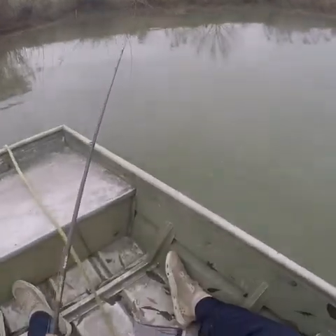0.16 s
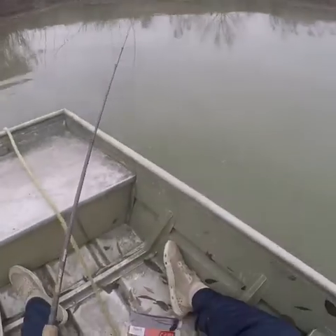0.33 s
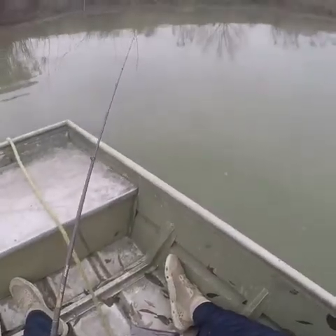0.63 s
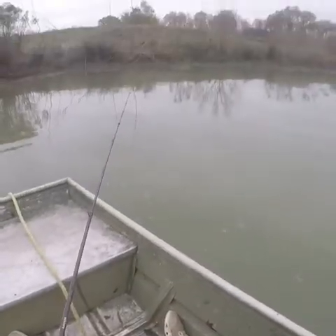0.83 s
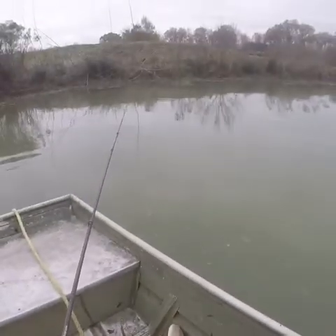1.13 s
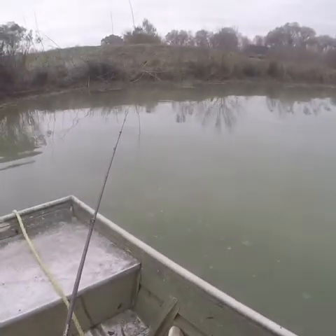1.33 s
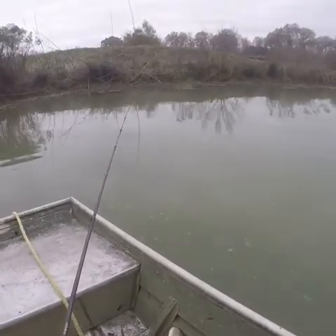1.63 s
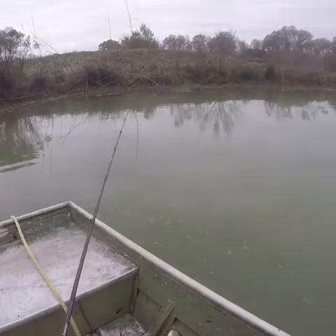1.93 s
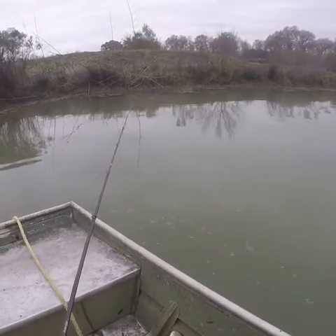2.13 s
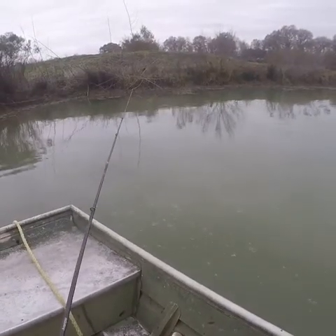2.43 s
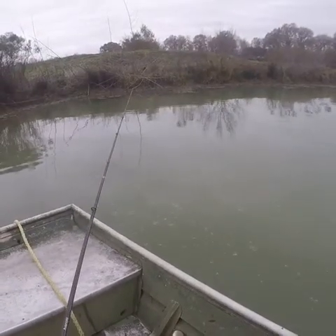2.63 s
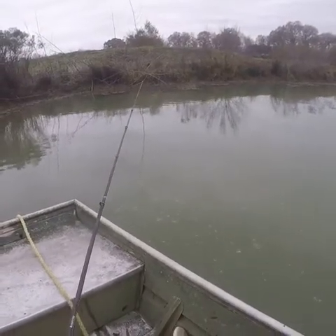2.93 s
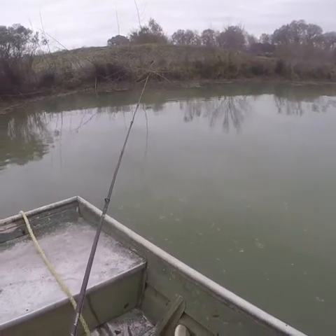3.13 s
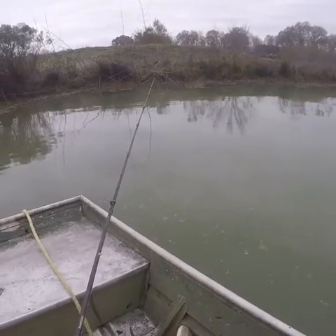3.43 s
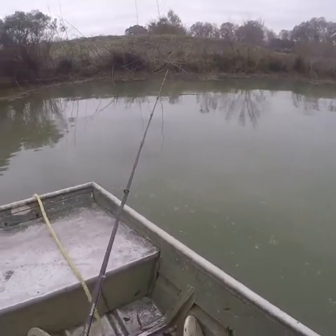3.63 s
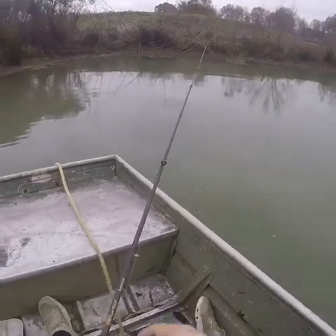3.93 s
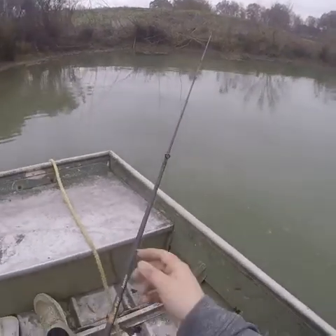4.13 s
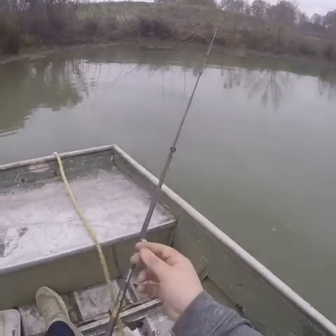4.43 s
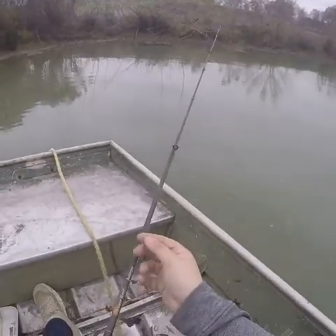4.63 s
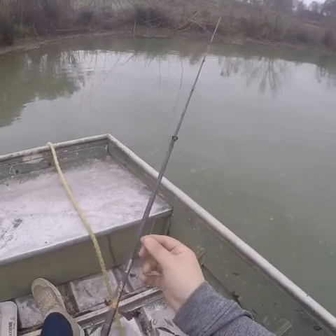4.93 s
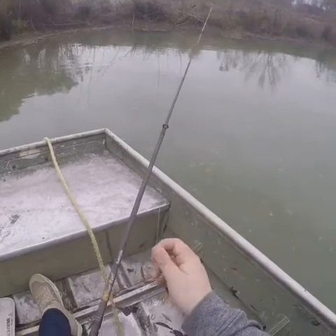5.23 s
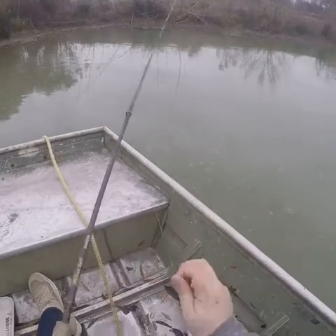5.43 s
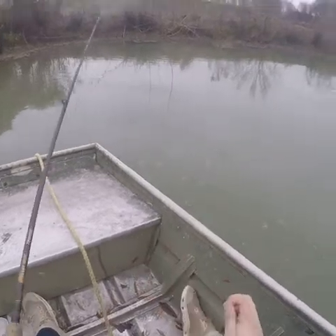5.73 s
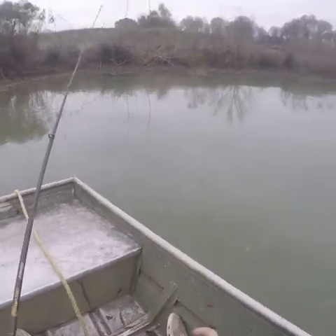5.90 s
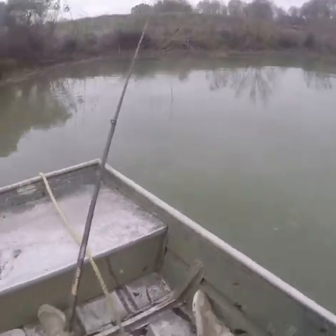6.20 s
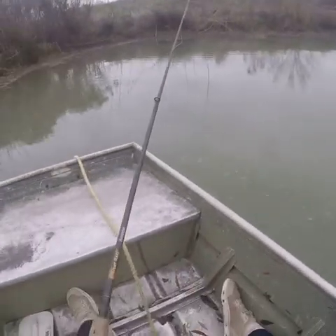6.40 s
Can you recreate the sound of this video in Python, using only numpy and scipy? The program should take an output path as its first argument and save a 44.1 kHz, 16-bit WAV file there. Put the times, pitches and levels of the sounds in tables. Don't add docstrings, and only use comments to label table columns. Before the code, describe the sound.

Irregular knocks, clacks and hollow low booms on a small metal boat's hull, over faint rumble and hiss on a still pond.

```python
import sys
import numpy as np
from scipy import signal
from scipy.fft import rfft, irfft, next_fast_len
from scipy.io import wavfile
from scipy.ndimage import uniform_filter1d, map_coordinates

SR = 44100
rng = np.random.default_rng(int(sys.argv[2]) if len(sys.argv) > 2 else 0)


def elevation(decibels):
    levels = np.asarray(decibels, float)
    return 10 ** (levels / 20)


def to_wav(sig):
    pcm = np.clip(np.atleast_2d(sig), -1, 1) * 32767
    pcm = np.round(pcm).astype(np.int16)
    wavfile.write(sys.argv[1], SR, pcm.T)


N = 289296

# t/s, peak level/dB, f/Hz, rebound re push/dB
PUSHES = [(0.057, -25, 100.5, -33), (0.116, -29.5, 91, -24), (0.382, -47, 112, -39),
          (0.486, -25, 110.5, -33), (0.566, -21.5, 100, -29), (0.798, -28.5, 112, -29),
          (0.854, -28, 93.5, -21), (1.221, -24.5, 116.2, -5.5), (1.513, -24.5, 102.8, -12),
          (1.811, -20.5, 100.6, -4), (1.965, -40, 106, -18), (2.118, -40.5, 91, -2),
          (2.367, -30.5, 100, -2), (2.594, -23, 117.4, -16), (2.879, -30.5, 106, -5),
          (3.002, -29, 104.5, -5), (3.3, -27.5, 112.7, -0.5), (3.555, -39.5, 118, -1),
          (3.678, -30, 88, -33), (3.979, -34, 91.4, 2.5), (4.213, -29.5, 107.8, -7), (4.496, -40, 124.3, 2),
          (4.77, -30.5, 103, -20), (4.829, -28, 104.5, -4), (5.264, -23.5, 92, 1), (5.489, -43, 91.7, -10),
          (5.801, -44.5, 102.6, 0), (5.967, -38.5, 119.6, -23), (6.134, -29.5, 92, 0),
          (2.756, -27, 104, -25)]


def unit(x):
    return x / np.sqrt(np.mean(x ** 2) + 1e-20)


def peak_one(x):
    return x / np.sqrt(uniform_filter1d(x ** 2, size=400).max() + 1e-20)


def wobble(rate):
    knots = rng.standard_normal(int(N * rate / SR) + 4)
    return map_coordinates(knots, [np.arange(N) * rate / SR])


def filtered(x, response):
    m = next_fast_len(len(x) + 4096)
    return irfft(rfft(x, m) * response(np.fft.rfftfreq(m, 1 / SR)), m)[:len(x)]


def resonance(f, hz, width_hz):
    return 1j * f * width_hz / (hz * hz - f * f + 1j * f * width_hz + 1e-9)


def noise(spectrum):
    hz, db = np.transpose(spectrum)
    colour = lambda f: elevation(np.interp(np.log(f + 1), np.log(hz + 1), db))
    return unit(filtered(rng.standard_normal(N), colour))


def add(track, s, sound):
    part = track[max(round(s * SR), 0):][:len(sound)]
    part += sound[:len(part)]


def bird():
    # t/s, length/s, first f/Hz, last f/Hz, level/dB
    calls = [
        (1.5, .3, 1300, 1280, -73),
        (2.8, .23, 1310, 1380, -77),
        (3.08, .19, 1350, 1490, -76),
    ]
    rise_s, fall_s, edge_db = 0.04, 0.07, -15
    out = np.zeros(N)
    t = np.arange(N) / SR
    for s, length, first_hz, last_hz, level_db in calls:
        end = s + length
        hz = np.interp(t, [s, end], [first_hz, last_hz])
        edge = np.interp(t, [s, s + rise_s, end - fall_s, end], [1, 0, 0, 1])
        rasp = elevation(3 * wobble(120))
        waver = 1 + 0.045 * wobble(120)
        tone = np.sin(2 * np.pi * np.cumsum(hz * waver) / SR)
        out += elevation(level_db + edge_db * edge - 9) * rasp * tone * (edge < 1)
    return out


def pond():
    # f/Hz, level/dB per Hz
    rumble_colour = [(8.8, -48), (15, -1.5), (49, 11.5), (91, 9), (123, 1), (170, -17), (220, -59),
                     (370, -120)]
    # f/Hz, level/dB per Hz
    hiss_colour = [(350, -32), (600, -2), (717, -11), (1010, -9.5), (3680, -13), (4710, -12.5), (4980, -21),
                   (5480, -16), (6830, -18), (11800, -21), (13400, -20), (15100, -22.5), (16000, -49)]
    insects = unit(filtered(rng.standard_normal(N), lambda f: resonance(f, 5040, 150)))
    chorus = elevation(1.5 * wobble(3)) * insects
    whine = np.sin(2 * np.pi * 13668 * np.arange(N) / SR)
    out = elevation(-47.5) * noise(rumble_colour) + elevation(-68.5) * noise(hiss_colour)
    return out + elevation(-79.5) * chorus + elevation(-94) * whine


def brushes():
    # t/s, length/s, level/dB, centre f/Hz, width/Hz
    strokes = [(1.338, 0.033, -69, 2490, 500), (1.345, 0.076, -64, 4870, 3980),
               (1.387, 0.035, -61, 2120, 700), (1.469, 0.025, -63, 2200, 1500),
               (1.49, 0.13, -70, 2960, 4000), (1.786, 0.056, -61.5, 4440, 5000),
               (2.176, 0.047, -63, 5060, 3000), (2.532, 0.025, -59.5, 4450, 2000),
               (2.636, .015, -65, 4460, 3000), (2.91, 0.058, -66, 2980, 5000), (4.272, .02, -68, 1520, 150),
               (4.285, .04, -69.5, 3000, 600), (4.299, 0.061, -65.5, 5600, 6000),
               (5.582, 0.036, -70, 6100, 1200), (2.557, .014, -56, 12800, 3500),
               (2.558, 0.0073, -51.5, 10300, 1500), (2.58, .01, -67, 12000, 5000),
               (2.535, 0.021, -60, 2000, 1500), (2.533, .016, -70, 12000, 5000),
               (2.577, .03, -70, 4500, 4000), (1.799, 0.024, -55, 2210, 2000), (1.8, .009, -68, 6240, 1200),
               (1.829, 0.0073, -66, 4500, 3000), (1.233, 0.008, -54, 2000, 1500),
               (1.242, .011, -46.5, 3480, 2500), (1.25, .006, -64, 4000, 2000),
               (1.202, .014, -60, 1500, 1000), (1.364, 0.029, -59, 2480, 500), (1.37, .02, -72, 5500, 3500),
               (1.422, 0.023, -60, 4180, 800), (1.492, 0.013, -57.5, 5000, 5000),
               (5.118, 0.028, -59, 3000, 2470), (5.124, 0.0093, -59.5, 1200, 596),
               (5.255, 0.014, -62.5, 5030, 1500), (5.255, 0.021, -64, 2330, 1800),
               (4.579, 0.013, -58, 2000, 2500), (4.848, 0.017, -59, 3500, 5000),
               (3.972, 0.025, -54, 1800, 1200), (3.98, .03, -65, 1400, 1200), (5.14, .015, -67, 2200, 1500)]
    out = np.zeros(N)
    fibres = rng.standard_normal(N) * elevation(2.0 * wobble(300))
    for s, length, db, hz, width_hz in strokes:
        stroke = fibres[round(s * SR):][:round(length * SR)]
        stroke = unit(filtered(stroke, lambda f: resonance(f, hz, 1.18 * width_hz) ** 3))
        add(out, s, elevation(db) * stroke * np.hanning(len(stroke)) ** 0.57)
    return out


def murmur():
    # t/s, murmur level/dB
    load = [(0.0, -34.5), (0.2, -57.5), (0.4, -54.5), (1.04, -55.5), (1.38, -48), (1.62, -57),
            (2.01, -55.5), (2.35, -65), (2.56, -49), (3.07, -56.5), (4.29, -52.5), (4.44, -55),
            (5.17, -62.5), (5.33, -55), (5.52, -60.5), (5.88, -52), (6.05, -60.5), (6.56, -60.5)]
    # f/Hz, level/dB per Hz
    panel_colour = [(88, -23.5), (150, -5.5), (225, -13.5), (483, -11.5), (672, -26.5), (900, -32),
                    (1170, -49), (1980, -120)]
    slosh_db, slosh_rise_s, slosh_t60_s = -12, 0.017, 0.67
    load_s, load_db = np.transpose(load)
    panels_db = np.interp(np.arange(N) / SR, load_s, load_db)
    lumps = elevation(1.2 * wobble(25))
    panels = elevation(panels_db - 5.5) * unit(noise(panel_colour) * lumps)
    bottom = unit(filtered(rng.standard_normal(N), lambda f: resonance(f, 102.7, 40.2) ** 2))
    swing = np.zeros(N)
    t = np.arange(SR) / SR
    slosh = elevation(slosh_db - 60 * t / slosh_t60_s) * (1 - np.exp(-t / slosh_rise_s))
    for s, db, *_ in PUSHES:
        add(swing, s, elevation(db) * slosh)
    return panels + (swing + elevation(-61.5)) * bottom


def burst(t60, colour):
    t = np.arange(SR // 8) / SR
    decay = elevation(-60 * t / t60) + 0.041 * elevation(-60 * t / (2.7 * t60))
    shape = (1 - np.exp(-(t / 0.0018) ** 2)) * decay
    grains = np.repeat(rng.standard_normal(len(t) // 40 + 1), 40)[:len(t)]
    rattle = rng.standard_normal(len(t)) * elevation(3.5 * grains) * shape
    strike = 4.1 * (np.arange(len(t)) == round(0.00126 * SR))
    return peak_one(filtered(rattle + strike, colour))


def snaps():
    # t/s, peak level/dB, centre f/Hz, width/Hz, t60/s
    snap_rows = [(0, -55.5, 2460, 500, 0.033), (0, -55, 1530, 400, 0.059), (0.4767, -42, 3500, 600, 0.022),
                 (0.4783, -36, 4960, 1100, 0.022), (0.7835, -52.5, 6100, 1200, 0.027),
                 (.7855, -62, 15000, 1200, .025), (1.028, -54, 3000, 350, 0.025),
                 (1.03, -54.5, 4550, 408, 0.027), (1.2425, -51.5, 4600, 910, 0.034),
                 (1.241, -53, 2920, 1200, 0.03), (2.5615, -38.5, 2000, 1200, 0.047),
                 (2.562, -49, 3660, 900, 0.04), (3.002, -62, 5460, 4000, .015),
                 (3.974, -46, 1970, 600, 0.062), (3.975, -51, 4800, 920, 0.03),
                 (0.4772, -39, 2800, 700, 0.044), (1.19, -62, 1600, 1500, .07),
                 (1.4219, -52, 2170, 1500, .05), (1.483, -60.5, 1340, 300, 0.049),
                 (2.188, -60, 4500, 810, 0.023), (2.197, -52, 5500, 1360, 0.013),
                 (2.94, -65, 2200, 700, 0.035), (3.003, -61, 1750, 400, 0.025),
                 (3.2345, -60, 4300, 600, 0.025), (3.276, -70, 4250, 400, 0.022),
                 (3.289, -77, 4340, 500, .025), (3.605, -64, 2800, 900, 0.028),
                 (3.606, -61, 4630, 890, .04), (3.667, -54.5, 1390, 870, 0.074), (0, -55, 4220, 500, 0.034),
                 (0, -63, 6800, 2500, .015), (1.8243, -50.5, 5070, 900, 0.018),
                 (1.822, -56, 2850, 600, 0.02), (1.8245, -65, 7200, 2000, .02),
                 (3.877, -55.5, 1660, 1000, 0.018), (3.974, -49, 2800, 500, 0.046),
                 (5.124, -53.5, 2530, 1200, 0.048), (5.89, -60, 2010, 400, 0.027),
                 (3.235, -61, 6740, 1200, 0.022)]
    out = np.zeros(N)
    for s, db, hz, width_hz, t60 in snap_rows:
        add(out, s - 0.001, elevation(db) * burst(t60, lambda f: resonance(f, hz, width_hz) ** 2))
    return out


def ticks():
    # f/Hz, width/Hz, level/dB
    rim_modes = [(1295, 450, 13.5), (1900, 540, 9.5), (2530, 390, 2), (2600, 600, 4), (3000, 110, 10.5),
                 (4220, 670, 6.5), (4950, 90, -1), (4800, 140, -11), (6100, 180, 2)]
    # t/s, peak level/dB, body level/dB, top level/dB, t60/s
    dull_raps = [(0.001, -47, 6, -19, 0.029), (0.7536, -45, 1, -28, 0.042), (0.7865, -39, -8, -12.5, 0.018),
                 (1.0281, -46.5, -4, -14, 0.017), (1.19, -47, -9, -25, 0.031),
                 (1.2348, -48, 5.5, -12, 0.018), (1.2422, -37, -35, -20, 0.026),
                 (1.477, -52, 0.5, -13, 0.086), (1.4955, -53.5, -20, -14, 0.051),
                 (1.8245, -44, -25, -14, 0.048), (1.9774, -61, -18, -18, 0.031),
                 (3.274, -56, 1, -15.5, 0.057), (3.606, -50, -44, -15, 0.027), (3.665, -69, 21, -11, 0.023),
                 (3.699, -58.5, -7, -10, .035), (3.798, -69, 11.5, -10, 0.026),
                 (3.975, -50.5, 9, -39, 0.034), (4.1943, -35, -15, -28, 0.022),
                 (5.1217, -53, -3, -30, 0.035), (5.259, -56.5, 7, -12, 0.03), (5.782, -61.5, 0, -12, 0.025),
                 (5.907, -52.5, -11, -16, 0.017), (6.1124, -72, -13, -11, .035),
                 (6.1217, -57, 1, -9, 0.031)]
    # t/s, peak level/dB, centre f/Hz, body level/dB, top level/dB
    tackle = [(0.477, -27.5, 3900, -8.5, -12.5), (1.424, -45.5, 3900, -4.5, -12),
              (1.8032, -47, 4220, -2.5, -17), (2.198, -44.5, 5740, -25, -27),
              (2.5586, -39.5, 3860, -8, -15), (2.5614, -33.5, 4800, -4, -24), (2.94, -53, 4950, -4.5, -10),
              (3.003, -51, 4280, -5, -15), (3.232, -53.5, 4800, -10, -10), (3.2888, -56, 4330, -8, -11),
              (3.557, -61, 4260, -20, -9), (3.8768, -57, 4320, -6, -28), (4.184, -49, 4140, -6, -23),
              (4.5504, -57, 4180, -15, -16), (4.589, -47, 3980, -9, -19), (4.76, -56.5, 5250, -20, -11),
              (4.8571, -44, 4300, -11, -10.5), (5.8876, -50, 4530, -2.5, -15),
              (6.543, -67.5, 4570, 11, -15)]
    # f/Hz, width/Hz, depth/0-1
    case_dips = [(3400, 590, 0.6), (7200, 1000, 0.5)]
    tackle_t60_s = 0.034
    contacts = [(*row, tackle_t60_s) for row in tackle]
    for s, db, body_db, top_db, t60 in dull_raps:
        hz = 2800 - 12 * min(body_db, 0)
        contacts.append((s, db, hz, body_db, top_db, t60))

    out = np.zeros(N)
    for s, db, hz, body_db, top_db, t60 in contacts:
        mix_db = 2.5 * rng.standard_normal(len(rim_modes))

        def rim(f):
            modes = zip(rim_modes, mix_db)
            return 0.054 + sum(elevation(g + m) * resonance(f, c, w) for (c, w, g), m in modes)

        body = burst(3.2 * t60, lambda f: rim(f) * resonance(f, 1380, 2100) ** 3)
        tick = burst(t60, lambda f: rim(f) * resonance(f, hz, 1.38 * hz) ** 3)
        edge = burst(0.73 * t60, lambda f: resonance(f, 10150, 5000) ** 3)
        contact = tick + elevation(body_db) * body + elevation(top_db + 1.5) * edge
        add(out, s - 0.001, elevation(db - 6.5) * contact)
    for hz, width_hz, depth in case_dips:
        out = filtered(out, lambda f: 1 - depth * resonance(f, hz, width_hz))
    return out


def flexes():
    # t/s, peak level/dB, f/Hz, swell/s
    panel_swings = [(.003, -41, 105, 0.023), (.07, -40.5, 497, 0.0043), (.081, -35, 215, 0.0064),
                    (.478, -21.5, 438, 0.0035), (.492, -27.5, 363, 0.0095), (.482, -45, 1115, 0.0043),
                    (.505, -30, 114.6, 0.015), (.585, -39.5, 327, 0.011), (1.032, -43, 437, 0.0032),
                    (1.202, -32, 341, 0.0032), (2.564, -24, 427, 0.0049), (2.576, -26.5, 368.6, 0.0099),
                    (2.563, -31, 192.6, 0.021), (2.566, -49, 1080, 0.0072), (2.595, -26, 118.5, .012),
                    (2.685, -27, 112, 0.0081), (3.986, -40, 390, 0.0039), (4.48, -36, 355, 0.0038),
                    (4.59, -34, 417, 0.0033), (4.855, -49, 417, 0.0065), (4.832, -35, 113.5, .011),
                    (5.266, -39, 415, 0.0068), (5.28, -37, 179.7, 0.0098), (5.262, -32, 89, 0.0047),
                    (5.352, -37, 104, 0.024), (5.371, -51.5, 349, 0.011), (6.115, -47, 199, 0.012),
                    (6.125, -41, 359, 0.0096), (6.185, -55, 417, 0.01), (0, -42.5, 1025, 0.0033),
                    (0, -38, 644, 0.0022), (.025, -47.5, 481, 0.011), (.49, -42, 612, 0.0082),
                    (1.07, -39, 118, 0.0093), (2.562, -37.5, 707, 0.004), (3.678, -39.5, 361, 0.0062),
                    (3.6, -51.5, 480, 0.0062), (4.88, -43, 102.3, 0.017), (4.94, -36, 101, 0.017),
                    (5.126, -46, 345, 0.0044), (5.165, -52.5, 294, 0.0078), (5.31, -46, 94.4, 0.0065),
                    (6.471, -47.5, 72, 0.028), (1.195, -37.5, 212, 0.015), (1.215, -36.5, 179, 0.0078),
                    (1.196, -51, 643, 0.01), (1.897, -30, 103.8, 0.016), (1.815, -37, 390.5, 0.0089),
                    (2.18, -60, 377, 0.017), (4.503, -40.5, 153, 0.0059),
                    (0.00803, -43, 470, 0.0072),
        (1.4, -43.5, 510, 0.0072),
        (1.3, -51, 470, 0.0062),
        (1.7, -38.5, 108, 0.018),
        (3.282, -40.5, 440, .006),
        (3.2, -43.5, 219, .006),
        (3.2, -50.5, 483, 0.0042),
        (4.394, -47.5, 590, 0.0057),
        (2.6, -49, 470, .008),
    ]
    out = np.zeros(N)
    t = np.arange(SR // 4) / SR
    for s, db, hz, swell_s in panel_swings:
        u = t / swell_s
        add(out, s, elevation(db + 3) * u * np.exp(1 - u) * np.sin(2 * np.pi * hz * t))
    return out


def ring(modes, damping, rise_cycles, spread, seconds):
    t = np.arange(SR // 2)[:int(seconds * SR)] / SR
    hz, db, t60 = np.repeat(modes, 2, axis=0).T[..., None]
    detune, strength, phase = rng.standard_normal((3, len(hz), 1))
    quick = np.float32
    swell = (1 - np.exp(quick(-hz / rise_cycles) * quick(t))) ** 2
    decay = quick(elevation(db + 2.3 * strength)) * np.exp(quick(-np.log(1000) * damping / t60) * quick(t))
    swings = np.sin(quick(2 * np.pi * (hz * (1 + spread * detune) * t + phase)))
    sound = (swell * decay * swings).sum(0)
    return peak_one(sound * np.cos(np.pi / 2 * (t / seconds) ** 2))


def booms():
    t60_s, rebound_s, rebound_sag = 0.27, 0.092, 0.93
    swings = []
    for s, db, hz, back_db in PUSHES:
        swings.append((s, db, hz))
        swings.append((s + rebound_s, db + back_db, hz * rebound_sag))
    out = np.zeros(N)
    for s, db, hz in swings:
        group = [(hz, 0, t60_s), (1.22 * hz, -5, t60_s), (0.807 * hz, -7, t60_s)]
        boom = ring(group, damping=0.78, rise_cycles=0.18, spread=0.053, seconds=0.38)
        add(out, s - 0.008, elevation(db - 8.5) * boom)
    return out


def knocks():
    # f/Hz, level/dB, t60/s
    low_panels = [(174.4, 0.5, 0.26), (189.6, -1.5, 0.35), (216.7, -1, 0.29), (257.4, -3.5, 0.32),
                  (280.3, -4.5, 0.41), (316.5, -4, 0.44)]
    mid_panels = [(341, -1, 0.24), (370.1, -1.5, 0.35), (415, 0.5, 0.23), (440.1, -2, 0.22),
                  (475, -8, 0.43), (515.7, 0.5, 0.18)]
    high_panels = [(582.4, 1, 0.24), (624, -4, 0.24), (708, 1, 0.11), (868, -6, 0.12), (953, -13, 0.14),
                   (1067, -12.5, 0.13), (1200, -43, 0.085)]
    # t/s, peak level/dB, struck panel f/Hz, low panels level/dB, high panels level/dB
    rod_taps = [(0.002, -39.5, 403, -0.5, -8.5), (0.319, -54.5, 346, 5, -12.5), (0.757, -40.5, 444, 5, -12),
                (1.032, -39, 375, -1.5, -10), (1.192, -36.5, 408, 2, -13.5), (1.238, -40, 340, -9, -15),
                (2.192, -60, 380, 1, -9), (2.57, -30.5, 410, 3, -11.5), (2.941, -42, 340, -1, -19),
                (3.246, -49, 434, -3, -17), (3.283, -36.5, 381, 1, -12), (3.67, -33.5, 465, -2.5, -12.5),
                (3.877, -51.5, 391, 1, -22), (3.978, -32.5, 415, -0.5, -10.5), (4.214, -57, 474, 9.5, -16),
                (5.126, -45, 329, -1.5, -16.5), (5.552, -75, 358, 14, -18), (5.783, -46, 382, -2, -17.5),
                (5.902, -47.5, 382, 4, -16), (6.538, -54.5, 537, -13, -15)]
    # t/s, peak level/dB, struck panel f/Hz, low panels level/dB
    shoe_thuds = [(0.073, -38, 444, -1), (0.481, -22, 426, -4), (0.788, -37, 379, -4.5),
                  (1.428, -39, 475, 1.5), (1.485, -44.5, 403, -7), (1.802, -38, 415, -3.5),
                  (1.826, -42.5, 396, -12), (2.153, -61, 363, -4), (2.357, -38, 392, -6.5),
                  (2.492, -52.5, 398, -15), (2.784, -44, 390, 1.5), (2.921, -44, 390, -13),
                  (2.992, -43.5, 386, 1.5), (3.401, -45, 404, -4), (3.563, -52.5, 403, 10),
                  (3.752, -47, 336, 5), (4.191, -45.5, 437, 2.5), (4.297, -49.5, 378, 1.5),
                  (4.396, -41.5, 357, 0.5), (4.43, -54, 417, -19), (4.483, -43.5, 396, 0),
                  (4.591, -40.5, 436, -6.5), (4.765, -52.5, 374, 4), (4.791, -57, 328, 8.5),
                  (4.858, -46.5, 415, -14), (5.261, -36.5, 406, 4), (5.373, -51, 362, 1),
                  (6.115, -38.5, 449, 1.5)]
    tap_damping, thud_damping, thud_high_db = 0.99, 0.87, -19.5
    blows = [(*row, tap_damping) for row in rod_taps]
    blows += [(*row, thud_high_db, thud_damping) for row in shoe_thuds]
    out = np.zeros(N)
    for s, db, struck_hz, low_db, high_db, damping in blows:
        damping = max(damping - 0.03 * low_db, 0.4)
        near = [(hz, level - 22 * abs(np.log2(hz / struck_hz)), t60) for hz, level, t60 in mid_panels]
        near.append((struck_hz, 2, 0.12))
        mid = ring(near, damping, rise_cycles=0.44, spread=0.01755, seconds=0.31)
        low = ring(low_panels, damping, rise_cycles=2.17, spread=0.03025, seconds=0.36)
        high = ring(high_panels, damping, rise_cycles=1.0, spread=0.0482, seconds=0.16)
        add(out, s - 0.002, elevation(db - 1.5) * mid)
        add(out, s - 0.002, elevation(db - 4.0 + low_db) * low)
        add(out, s - 0.002, elevation(db + 2.0 + high_db) * high)
    return out


def scene():
    background = pond() + bird() + brushes() + murmur()
    hull = snaps() + ticks() + flexes() + booms() + knocks()
    return (background + hull)[None]


def low_pass(x):
    return signal.sosfilt(signal.butter(12, 16440, fs=SR, output="sos"), x)


def record(dry):
    dull = filtered(dry[0], lambda f: 1 / (1 + (f / 15900) ** 40))
    return low_pass(dull[None])


dry = scene()
out = record(dry)
to_wav(out)
```